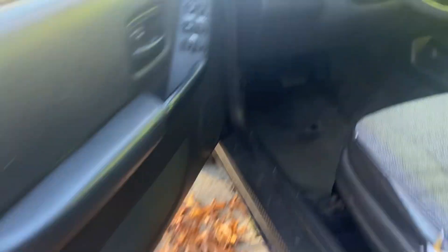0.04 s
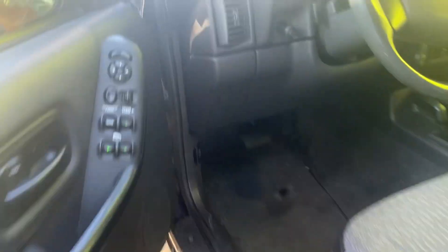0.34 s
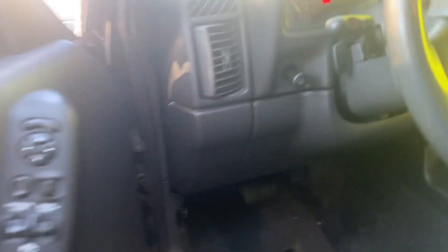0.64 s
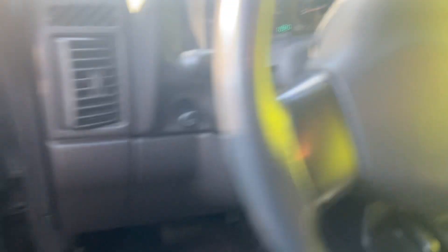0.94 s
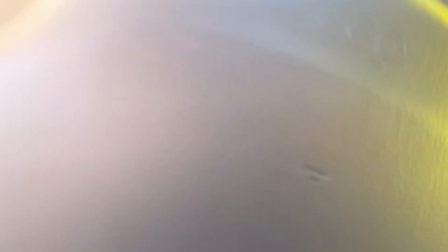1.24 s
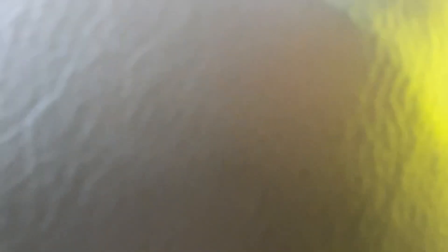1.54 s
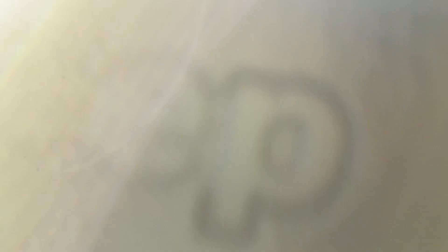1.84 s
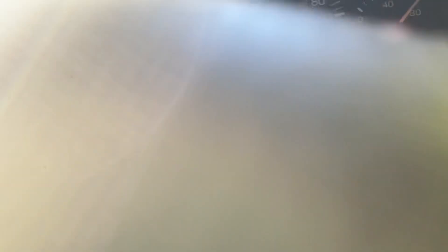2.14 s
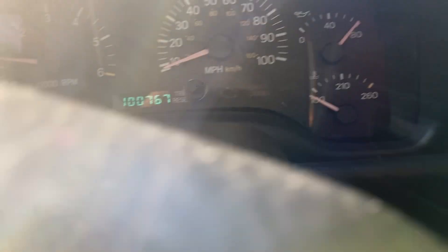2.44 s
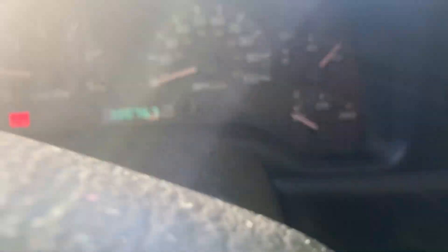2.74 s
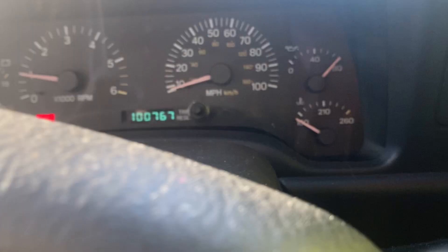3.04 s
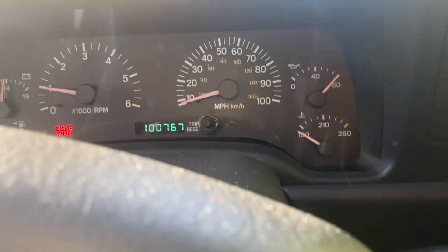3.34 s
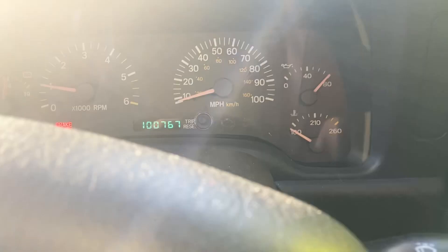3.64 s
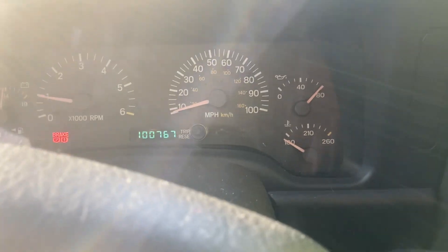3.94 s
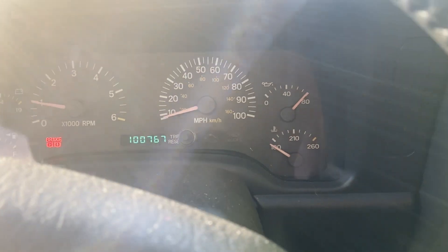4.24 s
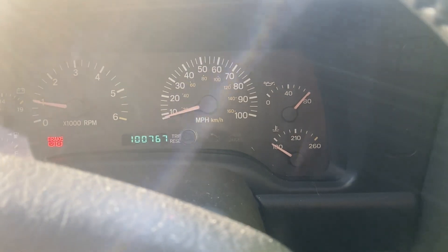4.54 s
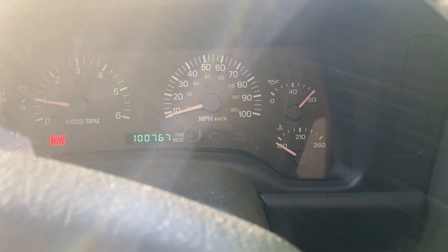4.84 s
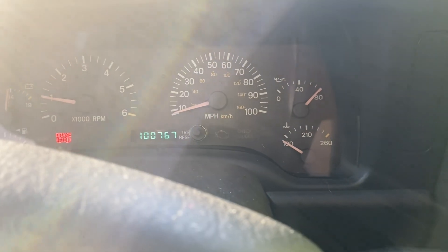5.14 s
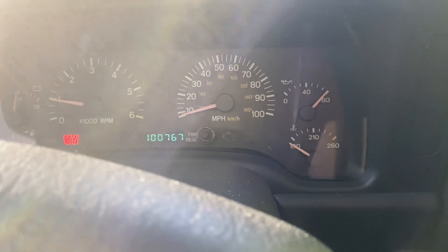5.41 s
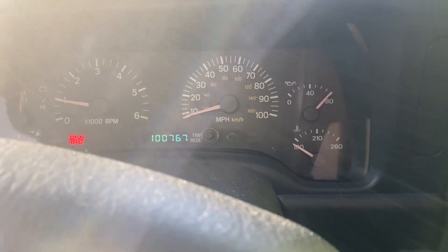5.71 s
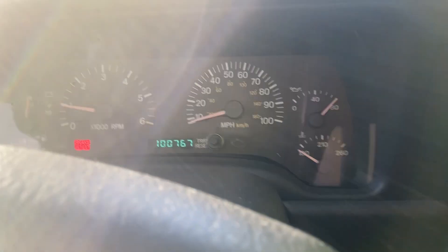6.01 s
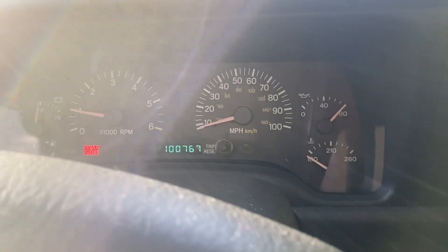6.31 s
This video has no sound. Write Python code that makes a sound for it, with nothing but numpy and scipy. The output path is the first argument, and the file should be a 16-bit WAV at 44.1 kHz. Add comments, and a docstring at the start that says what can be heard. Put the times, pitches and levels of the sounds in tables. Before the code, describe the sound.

A car engine idles steadily for the whole six and a half seconds, heard inside the cabin as a low, booming hum and rumble. Light mechanical clatter, a fan hum and a faint wavering belt whine sit above it. In the first second, clothes swish over the seat close to the microphone, with several small hard ticks and a coarser scrape at about 0.8 seconds. A few soft, dull bumps follow until about 1.6 seconds, and the engine clatter dulls as the microphone moves in from the open door. Quieter rustling comes around 2 seconds, then dies away. At about 4 seconds there is one quick double knock on plastic trim, with a faint key-like jingle and a slight rustle. After that the engine idles on evenly, almost alone, to the end.

```python
"""Inside a six-cylinder car at idle, driver's door open, the microphone moving in from the doorway.
The exhaust booms through the cabin over a rumble, a fan hums and the belt drive sings faintly;
the engine's clatter dulls as the microphone comes inside. Close by, someone slides in behind the
wheel: clothes rub and scrape over the seat, small hard things tick and jingle, and the plastic
trim takes one double knock."""
import sys
import numpy as np
from scipy import signal
from scipy.fft import rfft, irfft, next_fast_len
from scipy.io import wavfile

SR = 44100
rng = np.random.default_rng(int(sys.argv[2]) if len(sys.argv) > 2 else 0)


def wrap_up_sound(samples):
    """Save the sound to the file named by the first command line argument, as 16-bit audio."""
    columns = np.atleast_2d(samples).T
    # keep every value between -1 and 1, then stretch to whole-number steps
    tamed = np.clip(columns, -1, 1)
    steps = np.round(tamed * 32767).astype(np.int16)
    wavfile.write(sys.argv[1], SR, steps)


N = 280917
TIME = np.arange(N) / SR


def from_db(db):
    """Decibels to gain."""
    return 10 ** (np.asarray(db) / 20)


def unit_rms(x):
    """Scale to unit power."""
    return x / np.sqrt(np.mean(x ** 2) + 1e-20)


def in_time(rows):
    """Each column of a curve at every sample."""
    times, *columns = np.transpose(rows)
    return [np.interp(TIME, times, column) for column in columns]


def at_hz(points, hz):
    """Read a table on a log-frequency axis."""
    freqs, values = np.transpose(points)
    return np.interp(np.log(hz + 1e-6), np.log(freqs), values)


def drift(rate_hz):
    """Smooth random wandering with a spread of 1."""
    pole = np.exp(-80 * np.pi * rate_hz / SR)
    noise = rng.standard_normal(N // 40 + 2002)   # one value per 40 samples, plus time to settle
    slow = signal.lfilter([1], [1, -2 * pole, pole * pole], noise)[2000:]
    return np.interp(np.arange(N) / 40, np.arange(len(slow)), unit_rms(slow))


def swell(s, rise_s, fall_s, shape=1.11):
    """A movement gathers speed up to its peak at s, then slows down."""
    from_peak = np.abs(TIME - s) / np.where(TIME < s, rise_s, fall_s)
    return np.exp(-np.minimum(from_peak, 8) ** shape)


def pan(left_db):
    """Channel gains that put the left side left_db above the right."""
    return from_db(np.array([[.5], [-.5]]) * left_db)


def stereo(mid, side, spread):
    """Left and right share the mid signal and take the side with opposite signs."""
    return mid + spread * side * [[1], [-1]]


def filtered(x, kind, hz, order=2):
    """Butterworth filter."""
    return signal.sosfilt(signal.butter(order, hz, kind, fs=SR, output="sos"), x)


def ring(x, hz, t60):
    """A unit click sets a sine of height 1 ringing."""
    radius, step = from_db(-60 / (t60 * SR)), 2 * np.pi * hz / SR
    return signal.lfilter([0, np.sin(step)], [1, -2 * radius * np.cos(step), radius ** 2], x + 1e-18)


def patter(per_s, modes, size_db=1.5):
    """Random small contacts of uneven size set a few resonances ringing; rms 1."""
    contacts = rng.random(N) < per_s / SR
    clicks = contacts * from_db(size_db * np.minimum(rng.exponential(1, N), 3))
    out = np.zeros((2, N))
    for hz, db, t60 in modes:
        mid, side = rng.standard_normal((2, N)) * clicks
        out += from_db(db) * unit_rms(ring(stereo(mid, side, spread=.29), hz, t60))
    return unit_rms(out)


# Left-right likeness of the cabin at large and of close sounds: (frequency [Hz], correlation [0-1])
CABIN_FIELD = [(45, 1), (70, 0.61), (190, 0.73), (380, 0.63), (700, 0.28), (1300, 0.049), (4400, 0.53),
               (7000, 0.4), (8500, 1), (15000, 0.99)]
CLOSE_FIELD = [(300, 0.67), (2400, 0.52), (6500, 0.39), (8500, 1), (15000, 1)]

def coloured(spectrum, likeness, grain=1, balance=((100, 0), (1000, 0))):
    """Stereo noise of a given colour, left-right likeness and balance, roughened by grain; rms 1."""
    size = next_fast_len(N)
    hz = np.arange(size // 2 + 1) * SR / size
    mid, side = rfft(rng.standard_normal((2, N)) * grain, size)
    alike = np.clip(at_hz(likeness, hz), -.999, .999)
    pair = stereo(np.sqrt(1 + alike) * mid, side, spread=np.sqrt(1 - alike))
    shaped = pair * from_db(at_hz(spectrum, hz)) * pan(at_hz(balance, hz))
    return unit_rms(irfft(shaped, size)[:, :N])


def cabin(x, share=.3, t60=.12, low_hz=1300):
    """Glass and dashboard, close around the microphone, return a short cluster of bright reflections."""
    age = TIME[:SR // 8]
    echoes = rng.standard_normal(len(age)) * from_db(-60 * age / t60)
    echoes = filtered(echoes, "high", low_hz)
    return x + share * signal.fftconvolve(x, echoes[None] / np.linalg.norm(echoes))[:, :N]


# Engine noise coming round the open door as the microphone moves in: (time [s], level [dB])
DOOR_SPILL = [(0, -36.5), (.9, -39), (1.4, -47), (2.0, -45), (2.4, -49)]

def door_spill_db():
    """The engine bay is heard less as the microphone leaves the doorway."""
    return in_time(DOOR_SPILL)[0]


def fan(speed, blade_hz=155.8, level_db=-46):
    """Out in the engine bay, the belt-driven fan hums at its blade rate."""
    angle = 2 * np.pi * blade_hz * np.cumsum(speed) / SR
    return np.sqrt(2) * from_db(level_db + 1.8 * drift(3.3)) * np.sin(angle) * pan(left_db=5.5)


def belt_travel(speed, slip=.0055, slip_hz=4):
    """How far the slipping belt has run, in seconds at its mean speed."""
    return np.cumsum(speed * (1 + slip * drift(slip_hz))) / SR


# Faint pulley tones: (pitch [Hz], width [Hz], relative level [dB], share of door spill followed [0-1])
PULLEY_TONES = [(424.4, 6.6, -14.5, 0.89), (596.6, 19, -14.5, 0.93), (647, 25, -13.5, 0.93),
                (1074, 24, -17, 0.96), (1148, 28, -13, 0.71), (1386, 22, -17.5, 0.071),
                (1634, 14, -19, 0.67), (2655, 23, -32.5, 0.79)]

def belt(speed, inside_db=-49.5, wander_db=-.8):
    """Unsteady pulley tones follow the crank speed and carry best at the doorway."""
    out, travel = np.zeros((2, N)), belt_travel(speed)
    spill_db = door_spill_db()
    lift_db = spill_db - spill_db[-1]
    for hz, width_hz, db, follows in PULLEY_TONES:
        carrier = np.exp(2j * np.pi * hz * travel)
        wavers = [drift(width_hz / 2) + 1j * drift(width_hz / 2) for _ in range(2)]
        mid, side = np.real(wavers * carrier)
        out += from_db(db + follows * lift_db) * stereo(mid, side, spread=.62)
    return from_db(inside_db + wander_db * drift(.27)) * out


# The belt drive's two main whines: (lower pitch [Hz], upper pitch [Hz])
WHINE_PITCHES = [988, 1025]
# Their strength at the microphone: (time [s], lower's level [dB], upper's level [dB])
WHINE_LEVELS = [(0, -50, -47), (.2, -46, -46.5), (.36, -56, -53), (.55, -51, -44), (.85, -45, -46),
                (1.12, -59, -51), (1.28, -50, -60), (1.4, -60, -56), (1.58, -53, -46), (2.0, -55, -61),
                (2.6, -53, -64), (3.05, -50.5, -54), (3.4, -54.5, -53.5), (3.85, -51, -58),
                (4.02, -58, -61), (4.22, -53, -54), (5.0, -54.5, -50.5), (5.35, -50, -54.5),
                (5.8, -58.5, -59), (6.05, -54, -54.5), (6.37, -58, -53)]

def whine(speed, unsteady=.85, waver_hz=14):
    """Two pulleys sing near one kilohertz, each a wavering tone that swells and fades in its own time."""
    out = np.zeros((2, N))
    for hz, db in zip(WHINE_PITCHES, in_time(WHINE_LEVELS)):
        carrier = np.exp(2j * np.pi * hz * belt_travel(speed))
        mid, side = [drift(waver_hz) + 1j * drift(waver_hz) for _ in range(2)]
        waver = stereo(1 + unsteady * mid, side, spread=.4)
        out += from_db(db) * unit_rms(np.real(waver * carrier))
    return out


# Clatter from the seat, its faint hissing top, and the door spill: (frequency [Hz], density [dB/Hz])
CLATTER_SPECTRUM = [(200, -20), (420, -0.5), (550, -1.5), (650, 2), (900, 1.5), (1150, -2.5), (1300, -7),
                    (1800, -10.5), (2500, -15.5), (3500, -20), (5000, -24.5)]
CLATTER_HISS = [(7300, -27.5), (8000, -31), (9000, -33), (13700, -35), (15000, -44)]
DOOR_SPECTRUM = [(60, -40.5), (130, -9.5), (260, 9.5), (450, 2.5), (700, 1.5), (1100, -3.5), (1600, -7),
                 (3000, -16), (8000, -32.5), (15000, -40)]
# The clatter's treble inside the car: (time [s], gain [dB])
TREBLE_GAIN = [(0, 1), (2.2, -1), (2.4, -1.5), (2.75, -0.5), (3.4, -0.5), (3.7, 0.5), (6.37, 0.5)]

def clatter(cycle, inside_db=-44, tap=.065, treble_hz=2200, flicker_db=1.23):
    """Valve gear pulses at the firing rate, heard inside and round the door; the treble flickers."""
    pulse = 1 + tap * np.cos(2 * np.pi * 6 * cycle)
    inside = coloured(CLATTER_SPECTRUM + CLATTER_HISS, CABIN_FIELD, pulse)
    inside *= from_db(inside_db) * pan(left_db=-.5)
    treble = filtered(inside, "high", treble_hz, order=1)
    treble_gain = from_db(in_time(TREBLE_GAIN)[0] + flicker_db * drift(14))
    doorway = from_db(door_spill_db()) * coloured(DOOR_SPECTRUM, CLOSE_FIELD, pulse)
    return cabin(inside + treble * (treble_gain - 1) + doorway)


# Engine rumble from the driver's seat: (frequency [Hz], density [dB/Hz])
RUMBLE_SPECTRUM = [(12, -30), (23, -11), (33, -15), (42, -9.5), (55, 1), (68, 3.5), (81, -6.5), (102, -1.5),
                   (135, -12.5), (190, -8.5), (240, -13.5), (350, -16), (450, -32), (900, -68.5),
                   (2000, -130)]
# Its upper part leans to the left: (frequency [Hz], left minus right [dB])
RUMBLE_LEAN = [(50, -1.5), (110, 7.5), (180, 2.5)]

def rumble(cycle, level_db=-32.5, depth=.14):
    """The engine's rumble fills the cabin and throbs with each bank of three cylinders."""
    bank, firing = np.cos(2 * np.pi * 3 * cycle), np.cos(2 * np.pi * 6 * cycle)
    throb = 1 + depth * (bank + .5 * firing)
    return from_db(level_db) * coloured(RUMBLE_SPECTRUM, CABIN_FIELD, throb, RUMBLE_LEAN)


# Stumbles of the engine: (time [s], loss of the firing tone [dB])
WEAK_FIRINGS = [(0.87, 4), (1.43, 6), (2.71, 4), (2.84, 5), (3.63, 7), (5.23, 9)]

def stumble_db(half_s=.057):
    """Level lost to weak firings at every sample."""
    return sum(loss_db * np.exp(-((TIME - s) / half_s) ** 2) for s, loss_db in WEAK_FIRINGS)


# The idle between stumbles: (time [s], crank speed [rpm])
IDLE_RPM = [(0, 947), (.75, 946), (1.1, 953), (1.5, 946), (2.6, 944), (3.2, 953), (3.8, 950), (4.3, 955),
            (5.3, 950), (6.37, 950)]

def crank_rpm(sag_rpm_per_db=1.0):
    """The idle hunts slowly and sags at each weak firing."""
    return in_time(IDLE_RPM)[0] - sag_rpm_per_db * stumble_db()


# Slow swell of the firing tone: (time [s], gain [dB])
BOOM_GAIN = [(0, -2.5), (.7, -2.5), (1.1, 0), (1.7, 1.5), (2.3, -1), (2.8, -3), (3.3, 0), (3.75, 0),
             (4.05, 2.5), (4.9, 0.8), (5.4, 0), (6.37, -2.5)]

def boom_db(flutter_db=1.9, flutter_hz=11):
    """The firing tone rises and sinks slowly, drops in a stumble and flutters by chance."""
    return in_time(BOOM_GAIN)[0] - stumble_db() + flutter_db * drift(flutter_hz)


# Engine tones, order 6 being the firing rate: (order [per four-stroke cycle], base level [dB rms])
ENGINE_ORDERS = [(6, -27.5), (7, -43), (8, -50.5), (9, -41.5), (11, -50), (12, -25.5), (13, -48), (15, -56),
                 (18, -55.5), (21, -49), (23, -55.5), (24, -38.5), (25, -47.5), (27, -48.5), (30, -53.5),
                 (36, -51.5), (42, -56.5)]
# Orders 12 and 24 change with the microphone's place in the cabin: (time [s], gain [dB])
HUM_GAIN = [(0, 2), (.8, -0.5), (1.06, 1), (1.25, -1.3), (1.8, -0.4), (3.3, 0.45), (6.37, -0.1)]
DRONE_GAIN = [(0, -3), (.9, -2.5), (1.08, 2.5), (1.3, -1.5), (1.65, -2.5), (2.3, 1.5), (3.6, -0.5),
              (5.0, 2.5), (5.75, 0.5), (6.37, -0.5)]

def exhaust(cycle, firm_waver=.018, loose_waver=.33):
    """Tones locked to the crank: firm ones join into pulses, the rest waver with uneven combustion."""
    out = np.zeros((2, N))
    swell_db = {6: boom_db(), 12: in_time(HUM_GAIN)[0], 24: in_time(DRONE_GAIN)[0]}
    for order, db in ENGINE_ORDERS:
        firm = order in (6, 9, 12, 15, 24, 30)
        waver = firm_waver if firm else loose_waver
        level = from_db(db + swell_db.get(order, 0))
        angle = 2 * np.pi * (order * cycle + (0 if firm else rng.random()))
        tone = (1 + waver * drift(11)) * np.sin(angle) + waver * drift(12) * np.cos(angle)
        out += np.sqrt(2) * level * tone * pan(left_db=1.2 * (order > 12))
    return out


# Faint jingles once the driver is seated: (time [s], level [dB], rise [s], fall [s])
JOSTLES = [(3.64, -60.5, 0.061, 0.079), (3.95, -52, 0.036, 0.031), (4.08, -63, 0.041, .06)]
# Resonances of the metal: (frequency [Hz], relative level [dB], t60 [s])
METAL_MODES = [(4290, -3, .014), (6480, -0.5, 0.015), (6900, -9, .01)]

def jingle():
    """Small metal parts, likely keys, tremble against each other when the car is jostled."""
    shaking = sum(from_db(db) * swell(s, rise_s, fall_s) for s, db, rise_s, fall_s in JOSTLES)
    return shaking * patter(per_s=220, modes=METAL_MODES)


# Dull bumps against the seat, and a brief low swell of engine drone at 1.08 s:
# (time [s], level [dB], half length [s], pitch [Hz])
SOFT_SWELLS = [(0.546, -47, 0.045, 1800), (0.84, -39, 0.035, 1000), (1.08, -36, 0.048, 169),
               (1.269, -39.5, 0.022, 420), (1.54, -37, 0.017, 623), (1.57, -35.5, 0.033, 330)]

def bumps_and_drone():
    """Each padded bump, and the brief engine drone, is a soft swell of noise an octave or two wide."""
    out = np.zeros((2, N))
    for s, db, half_s, hz in SOFT_SWELLS:
        band = [(hz / 8, -50), (hz / 1.5, 0), (hz * 1.5, -3), (hz * 5, -26), (hz * 30, -80)]
        out += from_db(db) * np.exp(-((TIME - s) / half_s) ** 2) * coloured(band, CLOSE_FIELD)
    return out


# Hard drags of cloth at the seat's edge: (time [s], level [dB], rise [s], fall [s])
EDGE_DRAGS = [(.75, -41, 0.03, .025), (.785, -40, .008, .012), (.818, -35.5, 0.019, 0.047),
              (1.95, -64, .05, .04)]
# The resonances they excite: (frequency [Hz], relative level [dB], t60 [s])
DRAG_MODES = [(1730, -5, 0.027), (2320, 1, 0.0063), (3260, -3, 0.0035), (5000, -3, .003),
              (6700, -1, 0.0039)]

def scrapes():
    """Coarse weave drags over the seat's edge in a run of tiny slips."""
    pressure = sum(from_db(db) * swell(s, rise, fall, shape=1.1) for s, db, rise, fall in EDGE_DRAGS)
    return pressure * patter(per_s=1500, modes=DRAG_MODES)


# A double knock within arm's reach: (time [s], ring level [dB], crack level [dB])
TRIM_BLOWS = [(3.9426, -21, -38), (3.9537, -25.5, -33)]
# Resonances of the plastic trim: (frequency [Hz], relative level [dB], t60 [s])
TRIM_MODES = [(226.4, -1.5, 0.35), (307, -2.5, 0.033), (533, -2.5, 0.022), (736, -.5, 0.043),
              (860, -8, 0.017), (1290, -15, 0.03), (1992, -13.5, 0.027), (2207, -22.5, 0.035),
              (2730, -28, 0.025), (4200, -31, 0.022)]

def knocks(crack_s=.0033, crack_band_hz=(500, 2500)):
    """Each blow sets the trim's modes ringing and makes a loose panel crack."""
    force, crack = np.zeros(N), np.zeros(N)
    for s, ring_db, crack_db in TRIM_BLOWS:
        start = round(s * SR)
        force[start] += from_db(ring_db)
        crack[start:] += from_db(crack_db) * np.exp(-np.minimum(TIME[:N - start] / crack_s, 50))
    body = sum((-1) ** k * from_db(db) * ring(force, hz, t60)
               for k, (hz, db, t60) in enumerate(TRIM_MODES))
    rattle = filtered(rng.standard_normal((2, N)), "band", crack_band_hz)
    return body + crack * unit_rms(rattle)


# Small hard things touching near the microphone: (time [s], relative level [dB], pitch [Hz])
HARD_TICKS = [(0.0535, -28, 6540), (0.1152, -18.5, 11900), (.1156, -25.5, 3800), (0.1349, -17.5, 13200),
              (0.1354, -13.5, 7400), (.1382, -23, 7040), (.1617, -31, 4400), (.1865, -32, 11500),
              (0.344, -25.5, 7500), (.3712, -22.5, 4200), (0.3732, -22.5, 6200), (.8055, -20, 2100),
              (.8235, -27, 4900), (0.841, -27, 3700), (0.958, -37, 3700), (1.268, -37, 3200),
              (1.292, -33, 8050), (3.6166, -39, 6900), (3.898, -47, 6800), (3.9375, -35, 6500),
              (3.957, -39, 7000), (3.968, -40, 13600), (4.6557, -42, 12200)]

def ticks(gain_db=-6, ring_t60=.0021, scatter_t60=.023, crack_share=.5, band_ratio=1.05):
    """Each tick is a crack around one broad resonance, scattered briefly by the surfaces near it."""
    out, age = np.zeros((2, N)), TIME[:SR // 8]
    decay = from_db(-60 * age / scatter_t60)
    for s, db, hz in HARD_TICKS:
        mid, side = rng.standard_normal((2, len(age)))
        scatter = stereo(mid, side, spread=.41)
        ringing = unit_rms(ring(scatter, hz, ring_t60))
        crack = unit_rms(filtered(scatter, "band", [hz / band_ratio, hz * band_ratio]))
        burst = ringing * decay + crack_share * crack * decay ** 2   # the crack dies twice as fast
        start = round(s * SR)
        out[:, start:start + len(age)] += from_db(db + gain_db) * burst
    return out


# Clothes sliding over the seat, right by the microphone:
# (peak time [s], hiss level [dB], rise [s], fall [s], scuff gain from pressing [dB])
CLOTH_STROKES = [(0.04, -33, 0.16, 0.041, -6), (0.151, -40.5, 0.095, 0.08, -3),
                 (0.371, -33, 0.035, 0.064, -9.5), (0.548, -33.5, 0.12, 0.054, -7),
                 (0.65, -38.5, 0.045, 0.067, -7), (0.825, -33, 0.08, 0.058, -5.5),
                 (1.0, -46, 0.085, 0.088, -2.5), (1.26, -55, 0.099, 0.1, -2), (1.44, -57.5, 0.12, 0.31, 0),
                 (1.83, -52.5, 0.058, 0.077, -1), (1.96, -45.5, 0.095, 0.068, -2),
                 (2.13, -55, 0.024, 0.097, 4.5), (2.29, -55.5, 0.072, 0.056, 2.5),
                 (3.63, -60.5, 0.14, 0.12, -6), (3.96, -55.5, 0.098, 0.11, 1), (4.7, -62, 0.064, 0.082, 2)]
# Colours of the hiss and the scuff: (frequency [Hz], density [dB/Hz])
HISS_SPECTRUM = [(600, -55.5), (1500, -22), (3000, -5), (5000, -2.5), (7400, -0.5), (9000, -4),
                 (12500, -4.5), (14200, -4), (15500, -20.5)]
SCUFF_SPECTRUM = [(100, -33.5), (400, -6), (900, -1), (2000, -1.5), (3200, -3.5), (5500, -6), (12000, -38)]

def cloth(scuff_db=1.0, grain_db=2.0, clump_db=1.5):
    """Fibres catch and slip in clumps: a bright hiss, and a lower scuff as the body presses the seat."""
    hiss_level, scuff_level = np.zeros(N), np.zeros(N)
    for s, db, rise_s, fall_s, press_db in CLOTH_STROKES:
        sliding = from_db(db) * swell(s, rise_s, fall_s)
        hiss_level = np.hypot(hiss_level, sliding)   # overlapping strokes add in power
        scuff_level = np.hypot(scuff_level, sliding * from_db(press_db + scuff_db))
    grain = from_db(grain_db * drift(700) + clump_db * drift(34))
    hiss = hiss_level * coloured(HISS_SPECTRUM, CLOSE_FIELD, grain)
    scuff = scuff_level * coloured(SCUFF_SPECTRUM, CLOSE_FIELD, grain) * pan(left_db=-4)
    return cabin(hiss + scuff)


def scene():
    """One crank drives every engine tone; the driver's noises lie close in front."""
    rpm = crank_rpm()
    cycle = np.cumsum(rpm / 120) / SR   # two turns per four-stroke cycle
    speed = rpm / rpm.mean()
    engine = exhaust(cycle) + rumble(cycle) + clatter(cycle) + belt(speed) + whine(speed) + fan(speed)
    return engine + cloth() + scrapes() + jingle() + ticks() + knocks() + bumps_and_drone()


# The right microphone port behind the left: (frequency [Hz], phase lag [rad])
PORT_LAG = [(6800, 0), (7400, .7), (7950, 1.6), (8400, 3.0), (9800, 3.3), (10500, 5.2), (13000, 6.5),
            (14600, 9.2)]
TOP_HZ = 15750

def record(dry):
    """The two microphone ports fall out of step in the treble; the top is cut steeply."""
    left, right = dry
    mirrored = np.concatenate([right, right[::-1]])   # keeps both ends smooth
    lag = at_hz(PORT_LAG, np.arange(N + 1) * SR / (2 * N))
    late_right = irfft(rfft(mirrored) * np.exp(-1j * lag))[:N]
    top_cut = signal.ellip(12, .1, 80, TOP_HZ, fs=SR, output="sos")
    return signal.sosfilt(top_cut, [left, late_right])


dry = scene()
out = record(dry)
wrap_up_sound(out)
```